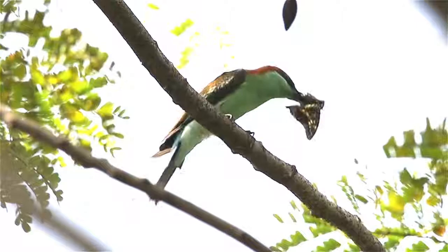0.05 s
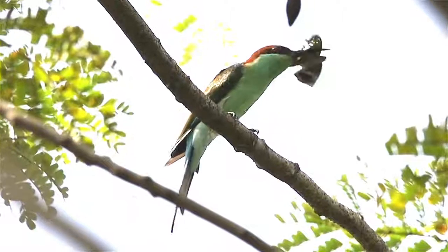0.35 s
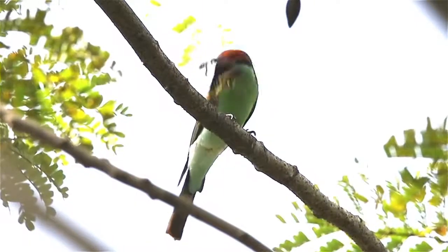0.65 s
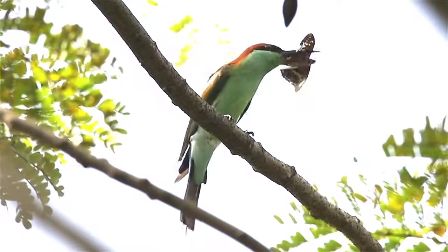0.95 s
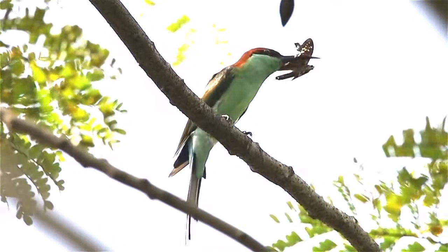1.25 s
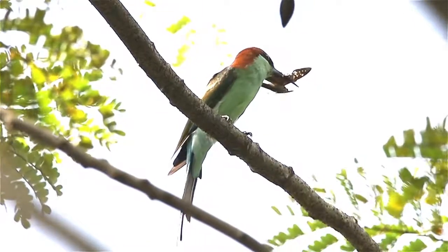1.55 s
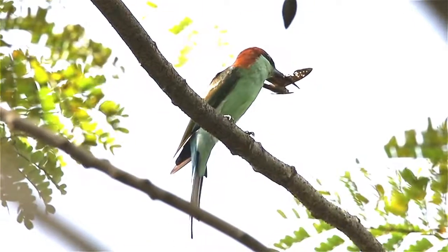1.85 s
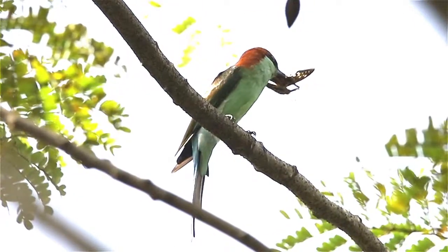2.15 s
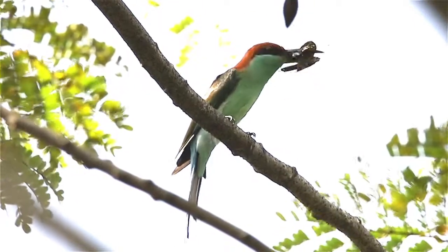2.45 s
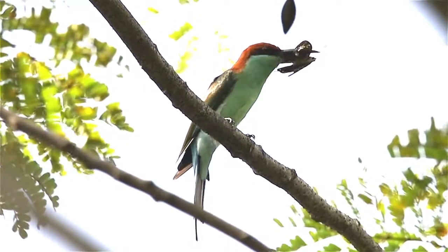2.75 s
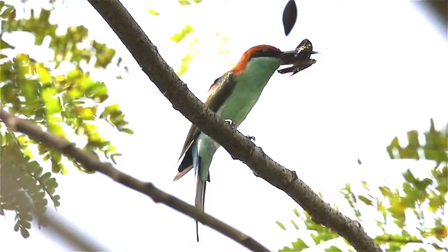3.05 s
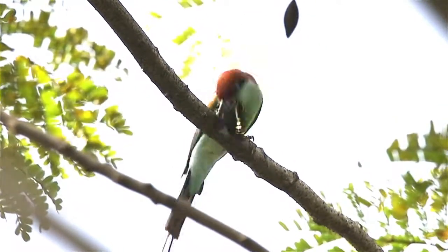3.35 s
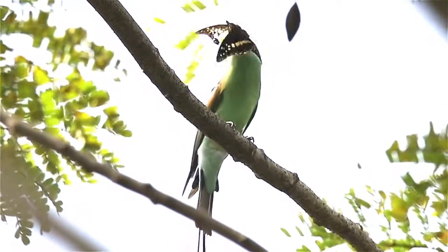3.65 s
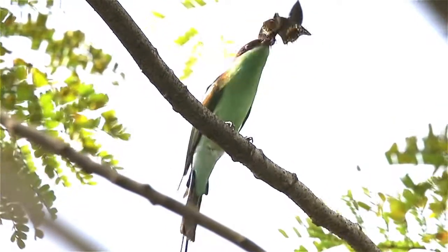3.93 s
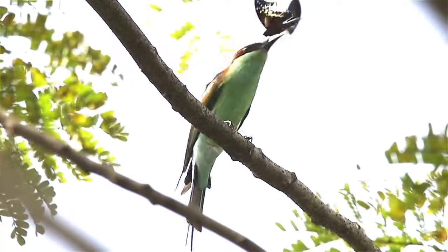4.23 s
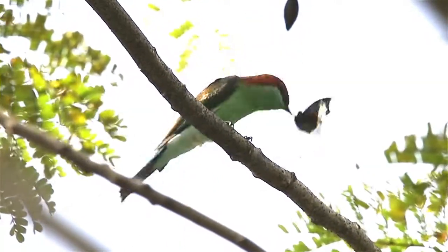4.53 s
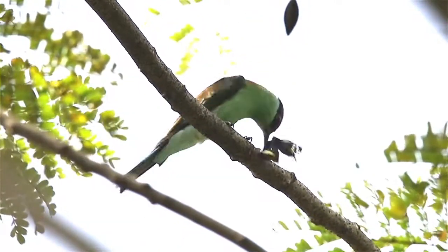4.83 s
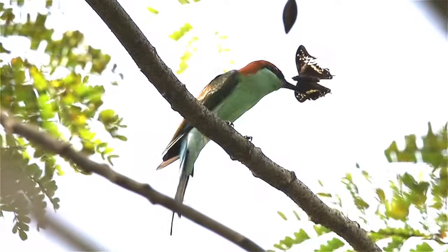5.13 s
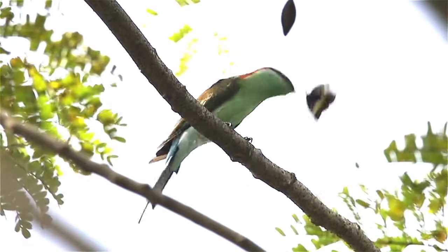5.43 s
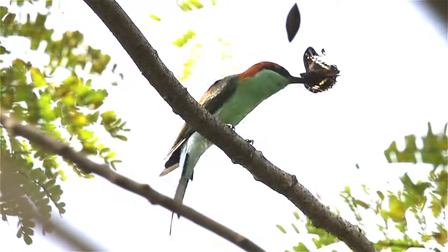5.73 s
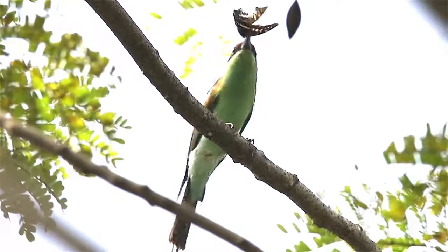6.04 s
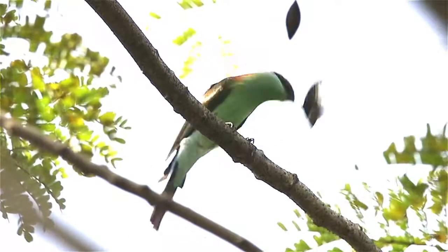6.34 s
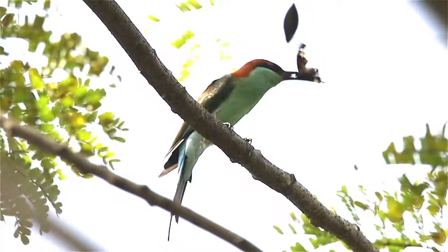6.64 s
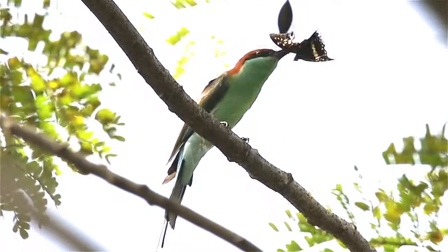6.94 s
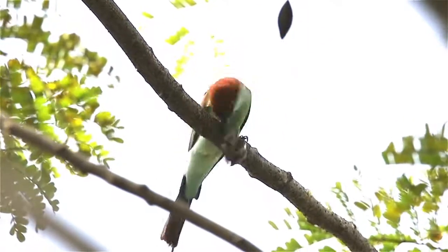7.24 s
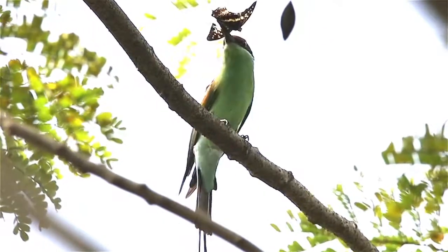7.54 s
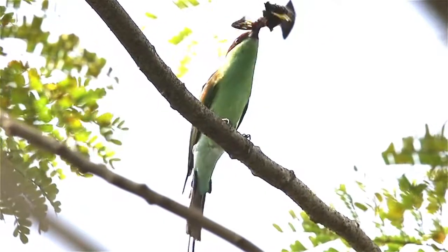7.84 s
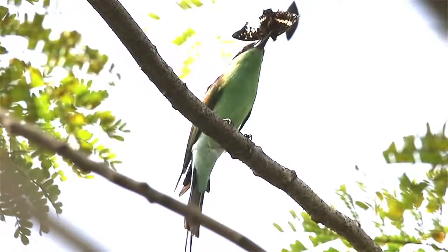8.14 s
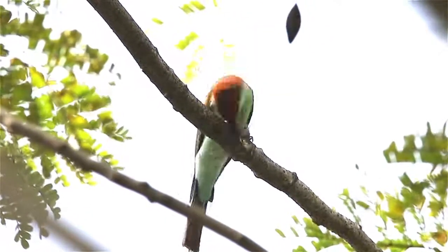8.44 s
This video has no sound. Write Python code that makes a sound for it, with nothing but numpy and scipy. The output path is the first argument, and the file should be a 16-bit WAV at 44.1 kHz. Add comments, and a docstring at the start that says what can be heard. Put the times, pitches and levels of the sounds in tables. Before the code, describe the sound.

Short high pips and trilled chirps from a nearby bird echo among trees, over distant birds and a faint outdoor rumble.

```python
"""In a wood, a bee-eater calls from a tree: short rising pips, trilled chirps and a held note. Its voice box
(the syrinx) makes an almost pure tone that turns hoarse when pushed high. Other birds answer from farther off,
and the leaves and trunks throw every call back. Under it lie a few dry ticks, three soft bumps, a low outdoor
rumble and a faint hiss of leaves; one sharp click sounds at 5.35 s."""
import sys
import numpy as np
from scipy import signal
from scipy.fft import rfft, irfft, next_fast_len
from scipy.io import wavfile
from scipy.ndimage import uniform_filter1d

SR = 44100
rng = np.random.default_rng(int(sys.argv[2]) if len(sys.argv) > 2 else 0)


def bounce(signal):
    """Save signal as a 16-bit WAV file at the path given by the first command-line argument."""
    frames = np.transpose(np.atleast_2d(signal))
    limited = np.clip(frames, -1, 1)
    pcm = np.round(limited * 32767).astype(np.int16)
    wavfile.write(sys.argv[1], SR, pcm)


N = 378319

QUICK_FADE_S, SLOW_FADE_S = 0.0027, 0.0047
BREAK_S = 0.0032  # the gap where a bird's voice breaks


def main_calls(level_db=-1, lowest_hz=1300):
    """Pips, chirps and the held note, with the bass filtered out."""
    calls = pips() + chirps() + held_note()
    return gain_of(level_db) * coloured(calls, lambda f: 1 - 1 / (1 + (f / lowest_hz) ** 10))


def pips(attack_s=0.0064, climb=0.114, bend=1.2):
    """Each pip is one rise that breaks off at its top."""
    # Each row: start and length in seconds, starting pitch in Hz, then in dB the level, the swell,
    # the overtone strength and the level of the lower voice.
    calls = [(3.206, 0.023, 2437, -12.5, 15.5, -28.5, -37.5), (5.3361, 0.013, 2560, -20.5, 0.5, -18.5, -43),
             (5.619, .021, 2524, -22.5, 1.5, -22.5, -54)]
    out = np.zeros(N)
    for start, length, hz, db, swell_db, overtone_db, under_db in calls:
        add(out, start, rise(length, attack_s, hz, climb, bend, db, swell_db, overtone_db))
        add(out, start + length - BREAK_S, undertone(under_db))
    return out


def chirps(start_hz=2477, climb=0.129, swell_db=8, under_db=-19.5, hoarse_lead_s=0.014):
    """A rise breaks into a trill and falls back; a hoarse rasp surrounds the trill."""
    # Chirps of the near bird, plus one very soft chirp (at 4.848 seconds) from a bird farther off.
    # Each row: start, fade-in, rise, trill and fall times in seconds, bend of the rise (1 is straight),
    # trill pitch in Hz, pulses per second, then in dB the rise, trill, fall, overtones and rasp,
    # and last the fraction by which the rasp's pitch shakes.
    calls = [(4.299, 0.0063, .059, .025, 0.027, 3.1, 3880, 78.7, -21, -16, -21, -11, -26.5, 0.1986),
             (4.848, .008, .017, .038, 0.036, 3.6, 3750, 25.4, -36.5, -33, -40.5, -32.5, -55, 0.096),
             (6.056, 0.0037, 0.023, .0276, .029, 8.7, 3335, 75.2, -20, -20.5, -23, -29.5, -46.5, .07),
             (6.428, 0.0036, .035, .023, .046, 3.6, 3320, 120, -20.5, -17.5, -20, -30, -39.5, 0.047),
             (6.683, 0.0063, 0.036, 0.0058, 0.015, 1.3, 3360, 150, -19, -36.5, -21.5, -30.5, -55, 0.053)]
    out = np.zeros(N)
    for (start, attack_s, rise_s, trill_s, fall_s, bend, top_hz, rate,
         rise_db, trill_db, fall_db, overtone_db, hoarse_db, shake) in calls:
        break_at = start + rise_s
        add(out, start, rise(rise_s, attack_s, start_hz, climb, bend, rise_db, swell_db, overtone_db))
        add(out, break_at + BREAK_S, trill(trill_s, top_hz, rate, trill_db, overtone_db))
        add(out, break_at + BREAK_S + trill_s, fall(fall_s, fall_db, overtone_db))
        add(out, break_at - BREAK_S, undertone(rise_db + under_db))
        hoarse_s = hoarse_lead_s + trill_s + fall_s
        add(out, break_at - hoarse_lead_s, hoarseness(hoarse_s, hoarse_db, shake))
    return out


def held_note(start=6.851, length=0.285, base_hz=2348, db=-35.5, quaver_hz=54, quaver_depth=0.75):
    """A soft quavering whistle; an accent at each end makes it louder, higher, steadier and purer."""
    # Each row: time of the peak in seconds, half its width in seconds, added level in dB.
    accents = [(6.869, 0.0146, 11), (7.112, 0.0193, 13.5)]
    climb_hz_per_s, hz_per_db, waver_hz = 340, 12.5, 34.4
    t = start + length * span(length)
    effort_db = sum(boost * np.exp(-abs((t - peak) / width) ** 3) for peak, width, boost in accents)
    hz = base_hz + climb_hz_per_s * (t - start) + hz_per_db * effort_db + waver_hz * wander(len(t), 25)
    voice = syrinx(hz, db + effort_db, overtone_db=-25 - 0.34 * effort_db)
    beat_hz = quaver_hz * (1 + 0.4 * wander(len(t), 30))
    beat = np.sin(2 * np.pi * np.cumsum(beat_hz) / SR)
    voice *= 1 + quaver_depth * gain_of(-effort_db) * beat
    out = np.zeros(N)
    add(out, start, faded(voice, 0.0091, SLOW_FADE_S))
    return out


def rise(length, attack_s, start_hz, climb, bend, db, swell_db, overtone_db, purer_db=6, flick_s=0.002):
    """Pitch and level climb and the tone grows purer; the pitch flicks up as the voice breaks."""
    progress = span(length)
    effort = progress ** bend
    flick = 0.17 * np.exp((progress - 1) * length / flick_s)
    hz = start_hz * (1 + climb * effort + flick)
    voice = syrinx(hz, db - swell_db * (1 - effort), overtone_db + purer_db * (1 - effort))
    return faded(voice, attack_s, QUICK_FADE_S)


def trill(length, top_hz, rate, db, overtone_db, sag=0.086, gap_db=-24.5, brighter_db=3.5):
    """The high voice comes in quick pulses and sags in pitch."""
    progress = span(length)
    shut = np.cos(np.pi * rate * length * progress) ** 6
    voice = syrinx(top_hz * (1 - sag * progress ** 2), db + gap_db * shut, overtone_db + brighter_db)
    return faded(voice, QUICK_FADE_S, QUICK_FADE_S)


def fall(length, db, overtone_db, from_hz=2930, to_hz=2347, bend=1.85, fade_db=-10.5, brighter_db=1):
    """The voice sinks back to a resting pitch and fades."""
    progress = span(length)
    hz = to_hz + (from_hz - to_hz) * (1 - progress) ** bend
    voice = syrinx(hz, db + fade_db * progress, overtone_db + brighter_db)
    return faded(voice, QUICK_FADE_S, SLOW_FADE_S)


def undertone(db):
    """A second, lower voice of the syrinx sounds where the first breaks, and sinks."""
    return note(length=0.026, hz=1996, db=db, glide=-0.05, rasp=0.08)


def hoarseness(length, db, shake, centre_hz=2830, shake_hz=900, overtone_db=-10):
    """The syrinx rattles: its pitch shakes so fast that the voice becomes a rasp."""
    count = len(span(length))
    hz = centre_hz * np.exp(shake * wander(count, shake_hz))
    return syrinx(hz, db, overtone_db) * signal.windows.tukey(count, 0.5)


def syrinx(hz, db, overtone_db, jitter=0.0046, strain_rasp=0.0041, shake_hz=700):
    """The voice box: a nearly pure tone with fuzzy overtones, hoarse when strained to a high pitch."""
    # How the beak sends out overtones. Each row: frequency in Hz, gain in dB.
    beak = [(4600, 5), (5300, 2.5), (6500, -7.5), (7500, -14.5), (8700, -25), (10000, -21), (11300, -8.5),
            (12300, -41.5), (13000, -60), (14200, -55.5), (15300, -40)]
    count = len(hz)
    strain = np.clip((hz - 2700) / 600, 0, 1)
    hz = hz * (1 + jitter * wander(count, shake_hz) + strain_rasp * strain * wander(count, 1200))
    voice = whistle(hz, db)
    fuzz = 0.2 + 0.5 * strain
    for multiple in range(2, 7):
        overtone_hz = multiple * hz
        follows = np.clip((13000 - overtone_hz) / 1000, 0, 1)  # the thin top ignores overtone_db
        overtone = whistle(overtone_hz, db + follows * overtone_db + read(beak, overtone_hz))
        overtone *= overtone_hz < SR / 2
        voice += overtone * (1 + fuzz * wander(count, shake_hz)) / np.sqrt(1 + fuzz ** 2)
    return voice


def main_layer(left_echo_db=-5, right_echo_db=-8, left_lag_s=0.000053, blur=0.53):
    """The main calls come from the right and reach the left a little later; their echo is all around."""
    # The left side hears less treble. Each row: frequency in Hz, gain in dB.
    left_shade = [(2400, -4), (3700, -3.5), (5200, -12.5), (7500, -21), (11000, -28), (15000, -27.5)]
    calls = main_calls()
    delayed = coloured(calls, lambda f: np.exp(-2j * np.pi * f * left_lag_s))
    blurred = calls * (1 + blur * wander(N, 365)) / np.sqrt(1 + blur ** 2)  # smears the echo's pitch
    echo = wood_echo(blurred, early=1.75, early_s=0.22, onset_s=0.0027)
    left, right = np.array([delayed, calls]) + gain_of([[left_echo_db], [right_echo_db]]) * echo
    return np.array([coloured(left, lambda f: gain_of(read(left_shade, f))), right])


def answers(pip_hz=2550, pip_s=0.013, gap_s=0.0034, arch_s=0.041):
    """A second bird answers with a short rising pip, then a clean note that arches up and down."""
    # Each row: start in seconds, top pitch of the arch in Hz, pip level in dB, arch level in dB.
    calls = [(0.887, 2522, -65.5, -45.5), (1.031, 2504, -49.5, -42.5), (1.301, 2488, -46, -44.5),
             (1.408, 2330, -38, -45.5), (1.645, 2293, -46, -48), (1.698, 2582, -70, -49.5)]
    out = np.zeros(N)
    for start, hz, pip_db, arch_db in calls:
        add(out, start, note(pip_s, pip_hz, pip_db, glide=0.044, rasp=0.003))
        add(out, start + pip_s + gap_s, note(arch_s, hz, arch_db, arch=0.112, rasp=0.0021))
    return out


def tsews():
    """Another bird repeats a sharp "tsew": a slightly hoarse whistle that falls in three steps."""
    # Each row: start in seconds, relative level in dB.
    calls = [(1.288, -44.5), (3.69, -46), (5.134, -46.5), (7.087, -44.5)]
    # Each row: delay into the call in seconds, length in seconds, pitch in Hz, added level in dB.
    steps = [(0, .038, 5290, -4.5), (.018, .028, 4315, -1), (0.033, .026, 3830, -7)]
    rows = [(start + delay, length, hz, db + step_db)
            for start, db in calls for delay, length, hz, step_db in steps]
    return notes(rows, glide=-0.025, arch=0.01, rasp=0.031, rasp_hz=500)


def far_birds():
    """Harsh, hoarse and thin calls from far off in the trees."""
    # Each row in all three: start in seconds, length in seconds, pitch in Hz, relative level in dB.
    scolds = [(.213, 0.082, 4870, -49.5), (.305, 0.082, 5190, -46.5), (.37, .1, 4510, -52)]  # harsh scolding bursts, the roughest of the far calls
    rasps = [(.13, 0.037, 2640, -53), (.56, 0.02, 4350, -48), (.885, 0.062, 2920, -51),
             (1.04, 0.042, 2956, -48), (1.31, .035, 3200, -50.5), (2.34, 0.029, 1928, -49),
             (2.75, 0.0078, 2050, -50), (3.93, .025, 1740, -56), (4.775, 0.05, 2480, -45.5),
             (4.93, .05, 2520, -47), (5.075, 0.029, 2500, -45.5), (5.55, 0.012, 2785, -41),
             (6.92, .19, 3040, -53.5), (7.75, 0.015, 1830, -52), (7.86, 0.012, 2310, -47),
             (8.26, 0.11, 2480, -59)]  # hoarse, drooping far calls
    whistles = [(1.835, 0.025, 2886, -54.5), (2.555, .085, 3337, -56), (4.085, .025, 3130, -63.5),
                (5.465, 0.028, 1154, -51), (5.84, .064, 3605, -56.5), (7.555, 0.055, 3706, -59)]  # thin, slightly rising whistles
    return (notes(scolds, glide=-0.027, arch=0.04, rasp=0.15, rasp_hz=860)
            + notes(rasps, glide=-0.0519, arch=0.027, rasp=0.092, rasp_hz=747)
            + notes(whistles, glide=0.04, arch=0.012, rasp=0.018, rasp_hz=704))


def chatter(level_db=-63, spread_db=3, count=40):
    """Many very distant birds: faint short notes at random times and pitches."""
    out = np.zeros(N)
    for when, length, pitch, slide, loud in rng.random((count, 5)):
        db = level_db + spread_db * (2 * loud - 1)
        call = note(0.017 + 0.056 * length, 1250 * 2 ** pitch, db, glide=0.09 * (slide - 0.5), rasp=0.016)
        add(out, when * N / SR, call)
    return out


def far_layer(left_db=1):
    """Distant birds: the farther away one is, the more of its sound is echo."""
    answer, tsew, far = answers(), tsews(), far_birds() + chatter()
    direct = answer + gain_of(-6) * tsew + gain_of(-9) * far
    echo = gain_of(1) * wood_echo(answer, early=0.97, early_s=0.33, onset_s=0.0072)
    echo += gain_of(2) * wood_echo(tsew, early=0.94, early_s=0.62, onset_s=0.0013)
    echo += gain_of(3) * wood_echo(far, early=1.94, early_s=0.14, onset_s=0.001)
    return (direct + echo) * gain_of([[left_db], [0]])


def wood_echo(x, early, early_s, onset_s):
    """Near leaves and trunks scatter a quick echo; far trees add a long one. Each side has its own."""
    # The long echo. Each row: frequency in Hz, seconds it takes to fade by 60 dB.
    fade_times = [(1500, 0.77), (2700, 1.46), (4000, 1.19), (6000, 0.87), (11000, 0.59)]
    count = SR // 12  # one reflection somewhere in every 12 samples
    arrivals = np.arange(count) * 12 + rng.integers(0, 12, (2, count))
    reflections = np.zeros((2, SR))
    np.put_along_axis(reflections, arrivals, rng.standard_normal(arrivals.shape) ** 3, 1)
    hz, t, bands = signal.stft(reflections, SR, nperseg=256)
    slow = np.exp(-np.log(1000) * t / read(fade_times, hz)[:, None])
    quick = early * np.exp(-np.log(1000) * t / early_s)
    build_up = 1 - np.exp(-t / onset_s)
    tail = signal.istft(bands * (slow + quick) * build_up, SR, nperseg=256)[1]
    tail /= np.linalg.norm(tail, axis=1, keepdims=True)
    return signal.fftconvolve(x[None], tail, axes=1)[:, :N]


def ticks():
    """Tiny dry snaps and one loud, sharp click at 5.35 s: bursts of noise with no ring."""
    # Each row: start in seconds, level in dB, decay in seconds, lowest frequency in Hz, left gain in dB.
    snaps = [(0.732, -53.5, 0.01, 4000, -26), (3.514, -48.5, 0.0054, 3930, -20),
             (5.352, -32, 0.00022, 520, -3.5), (8.508, -47, 0.0051, 5900, -16.5)]
    out, t = np.zeros((2, N)), np.arange(SR // 10) / SR
    for start, db, decay, low_hz, left_db in snaps:
        burst = rng.standard_normal(len(t)) * np.exp(-t / decay)
        snap = signal.sosfilt(signal.butter(2, low_hz, "high", fs=SR, output="sos"), burst)
        add(out, start, gain_of([[db + left_db], [db]]) * snap)
    return out


def bumps():
    """Soft bumps: a few low tones that swell and die away."""
    # Each row: time of the main tone's peak in seconds, level in dB, its length in seconds.
    hits = [(2.416, -39, .06), (4.886, -42, .04), (6.781, -33, .034)]
    # What a bump rings with. Each row: pitch in Hz, added level in dB, how many times as long it lasts.
    tones = [(165, 1.5, 1), (99.4, -7, 1.6), (278, -12.5, 1.4)]
    out = np.zeros(N)
    for peak, db, length in hits:
        for hz, tone_db, stretch in tones:
            swell = np.hanning(round(length * stretch * SR))
            add(out, peak - length / 2, swell * whistle(np.full(len(swell), hz), db + tone_db))
    return out


def rumble(level_db=-48, side_db=-13, swell_db=1.0, top_hz=523.5):
    """Low outdoor noise, nearly the same on both sides."""
    # Each row: frequency in Hz, relative level in dB.
    spectrum = [(15, -49.5), (25, -15.5), (70, -1), (97, -4), (123, 0.5), (172, 1.5), (211, -4.5),
                (311, -0.5), (379, -7.5), (458, -8.5), (500, -21), (650, -28), (1100, -120)]
    noise = rng.standard_normal((2, N))
    middle, side = coloured(noise, lambda f: gain_of(read(spectrum, f)) / (1 + (f / top_hz) ** 30))
    both = evened(middle) + gain_of(side_db) * evened(side) * np.array([[1], [-1]])
    return both * gain_of(level_db + swell_db * wander(N, 1.3))


def leaves(level_db=-53.63, shared=0.61, patch_db=1.3, lowest_hz=1125.4):
    """A faint hiss, brighter on the right, that rises when the leaves stir."""
    # Each row in both: frequency in Hz, relative level in dB.
    spectrum = [(1100, 7.5), (1600, 3), (2300, 6), (3000, -1.5), (4700, -5.5), (6500, -13.5), (7600, -18.5),
                (8150, -14.5), (8700, -20.5), (11000, -22), (15500, -25.5)]  # the hiss itself
    left_shade = [(1100, 3), (2200, -31), (3500, -23.5), (5500, -32.5), (9000, -33.5), (14000, -17)]  # added on the left side
    # Each row: time in seconds, how strongly the leaves stir.
    stir = [(0, 0), (.5, 3.5), (1.05, 8), (1.5, 2.5), (2.2, 0.5), (3.1, 5.5), (3.5, 13), (3.9, 3), (4.6, 5),
            (5.3, 2), (6.3, 5.5), (7.7, 2.5), (7.95, 8), (8.2, 4), (8.55, 7)]
    hz, t, noise = signal.stft(rng.standard_normal((3, N)), SR, nperseg=1024)
    patches = uniform_filter1d(rng.standard_normal(noise.shape[1:]), size=3, axis=0)
    patches = evened(uniform_filter1d(patches, size=12, axis=1))  # smooth in both pitch and time
    stir_db = np.interp(t, *np.transpose(stir)) * read([(1500, 0.72), (6000, 0.64)], hz)[:, None]
    band_db = read(spectrum, hz)[:, None] + patch_db * patches + stir_db
    bass_cut = 1 + (lowest_hz / (hz[:, None] + 1)) ** 30
    bands = (noise[:2] + shared * noise[2]) * gain_of(band_db) / bass_cut
    bands[0] *= gain_of(read(left_shade, hz))[:, None]
    hiss = signal.istft(bands, SR, nperseg=1024)[1][:, :N]
    return evened(hiss) * gain_of(level_db)


def notes(rows, glide, arch, rasp, rasp_hz):
    """Plays a table of notes that share one shape."""
    out = np.zeros(N)
    for start, length, hz, db in rows:
        add(out, start, note(length, hz, db, glide, arch, rasp, rasp_hz))
    return out


def note(length, hz, db, glide=0, arch=0, rasp=0, rasp_hz=600):
    """A plain note that glides and arches about its middle pitch; rasp shakes the pitch fast."""
    position = 2 * span(length) - 1
    pitch = hz * (1 + glide * position - arch * position ** 2)
    pitch *= 1 + rasp * wander(len(pitch), rasp_hz)
    return whistle(pitch, db) * signal.windows.tukey(len(pitch), 0.5)


def whistle(hz, db):
    """A pure tone that follows a pitch and a level."""
    return np.sqrt(2) * gain_of(db) * np.sin(2 * np.pi * np.cumsum(hz) / SR)


def faded(x, attack_s, release_s):
    """Fades a sound in and out smoothly."""
    t = np.arange(len(x)) / SR
    fade_in = np.sin(np.pi / 2 * np.minimum(t / attack_s, 1))
    fade_out = np.sin(np.pi / 2 * np.minimum(t[::-1] / release_s, 1))
    return x * fade_in * fade_out


def wander(count, hz):
    """A smooth random wobble of typical size 1, up to about hz fast."""
    return evened(coloured(rng.standard_normal(count), lambda f: np.exp(-(f / hz) ** 2)))


def coloured(x, gain):
    """Filters x by a gain that depends on frequency."""
    size = next_fast_len(x.shape[-1] + 2048)
    return irfft(rfft(x, size) * gain(np.fft.rfftfreq(size, 1 / SR)), size)[..., :x.shape[-1]]


def read(points, hz):
    """Reads between a table's frequencies, with octaves evenly spaced."""
    f, value = np.transpose(points)
    return np.interp(np.log(hz + 1), np.log(f + 1), value)


def span(length):
    """Runs from 0 to 1 over a length in seconds."""
    return np.linspace(0, 1, max(round(length * SR), 64))


def add(mix, start, sound):
    """Mixes a sound in at a start time in seconds."""
    part = mix[..., max(round(start * SR), 0):][..., :sound.shape[-1]]
    part += sound[..., :part.shape[-1]]


def gain_of(db):
    """Turns decibels into a multiplier."""
    return 10 ** (np.asarray(db) / 20)


def evened(x):
    """Scales x to an average power of 1."""
    return x / np.sqrt(np.mean(x ** 2) + 1e-20)


def suppress(x, depth_db=7, threshold_db=3):
    """Noise suppression: each narrow band is turned down while it stays near its own usual level."""
    bands = signal.stft(x, SR, nperseg=2048, noverlap=1536)[2]
    power = uniform_filter1d(abs(bands) ** 2, size=7, axis=-1)
    threshold = np.median(power, axis=-1, keepdims=True) * gain_of(threshold_db) ** 2 + 1e-24
    bands *= gain_of(-depth_db / (1 + (power / threshold) ** 2))
    return signal.istft(bands, SR, nperseg=2048, noverlap=1536)[1][:, :N]


def scene():
    """Birds near and far over the outdoor background."""
    return main_layer() + far_layer() + ticks() + bumps() + rumble() + leaves()


def record(dry, top_hz=15900):
    """Steady noise is turned down, then the highest treble is cut off."""
    treble_cut = signal.firwin(511, top_hz, window=("kaiser", 9), fs=SR)
    return signal.oaconvolve(suppress(dry), treble_cut[None], "same")


dry = scene()
out = record(dry)
bounce(out)
```